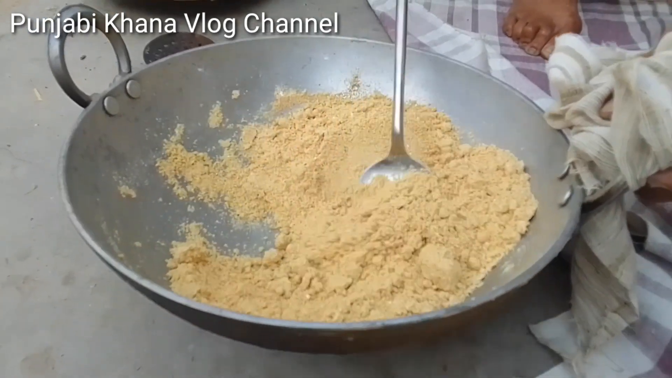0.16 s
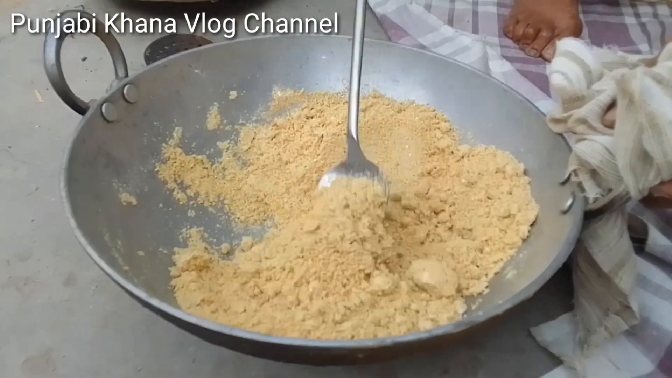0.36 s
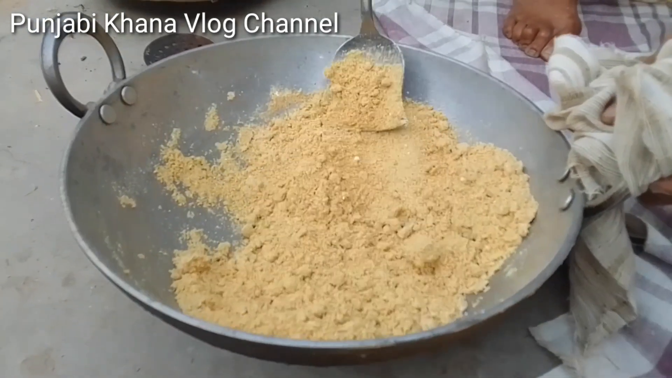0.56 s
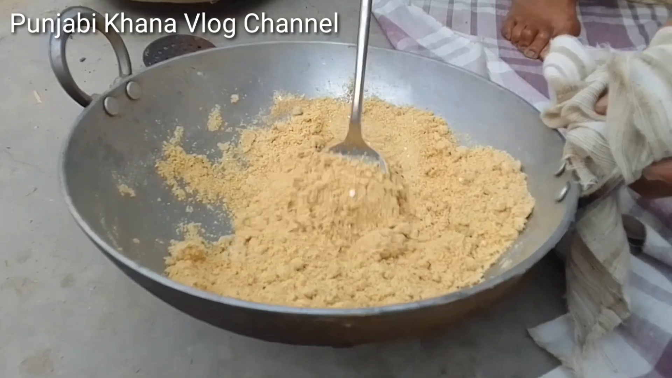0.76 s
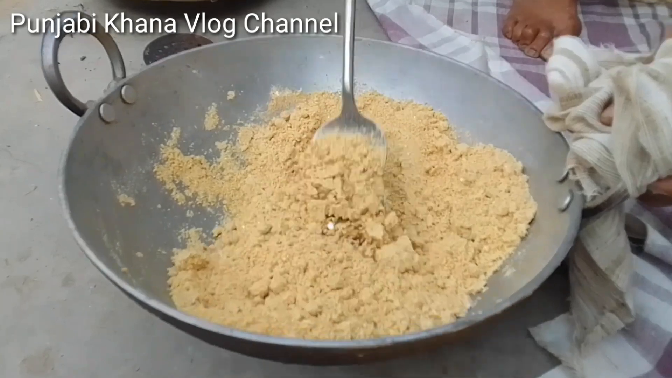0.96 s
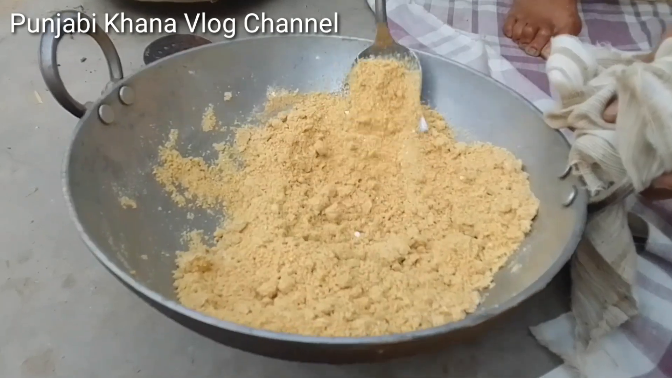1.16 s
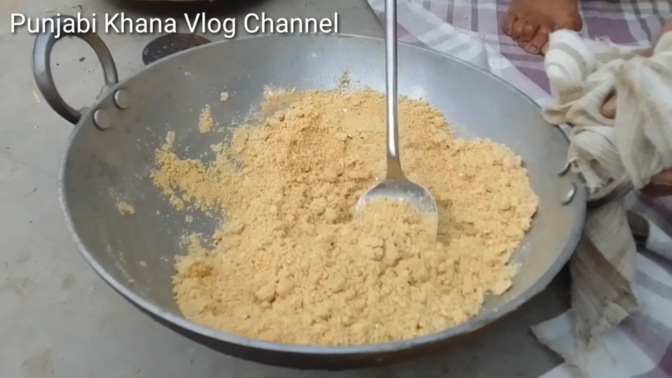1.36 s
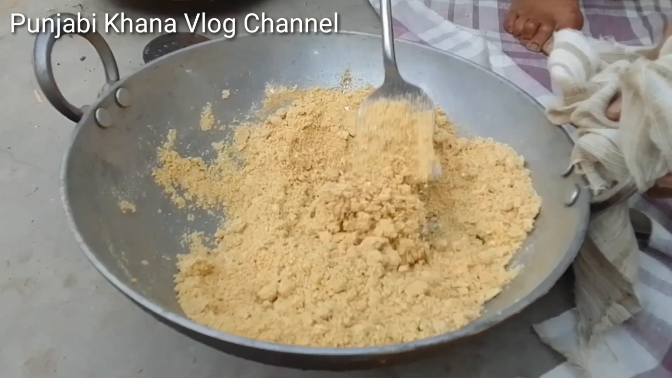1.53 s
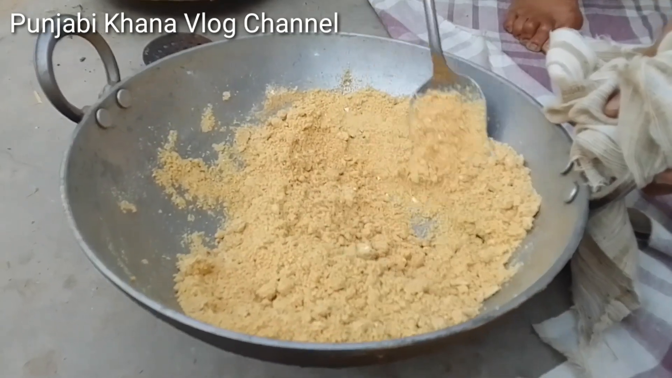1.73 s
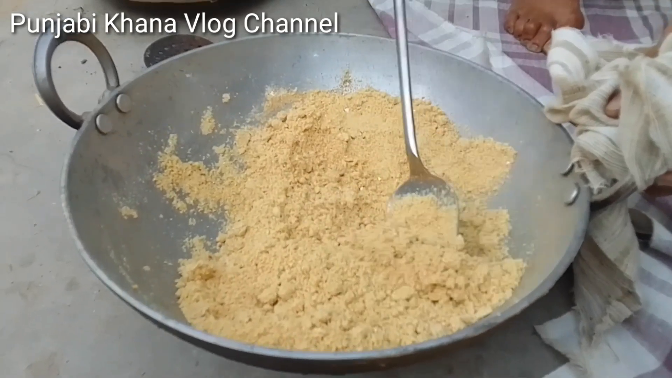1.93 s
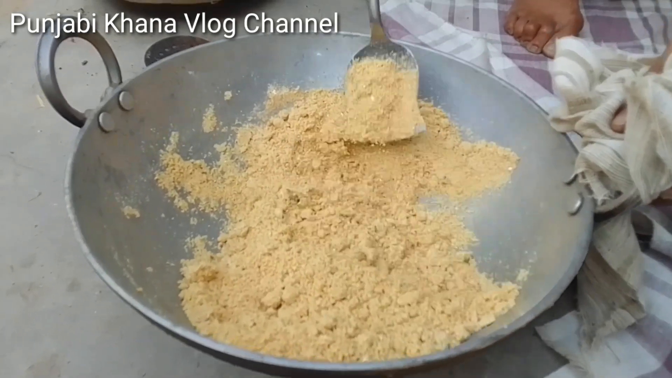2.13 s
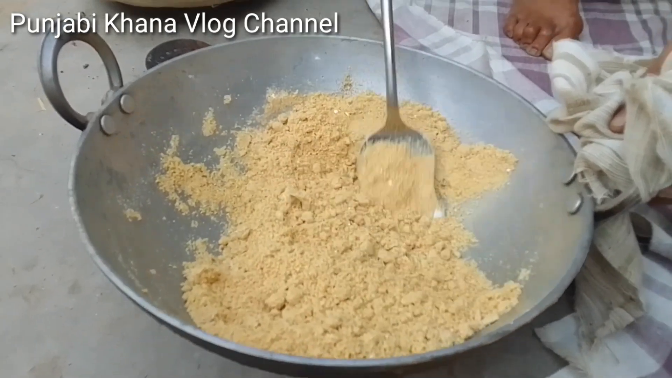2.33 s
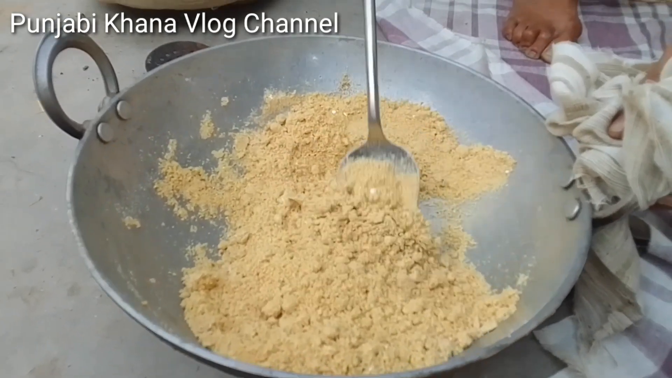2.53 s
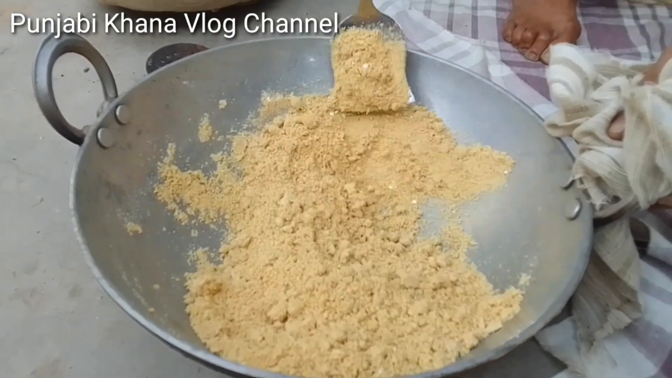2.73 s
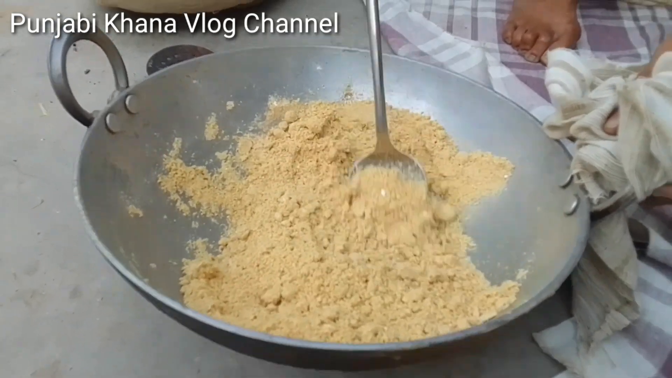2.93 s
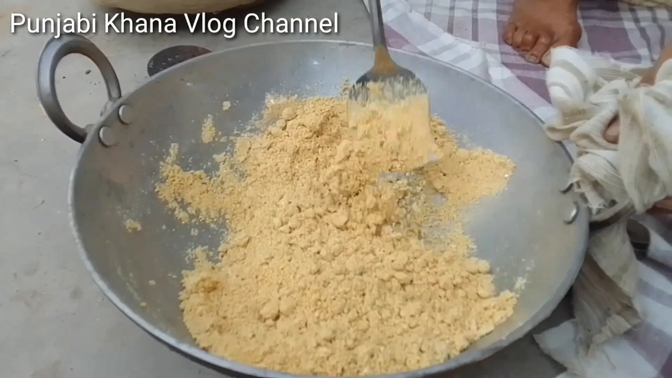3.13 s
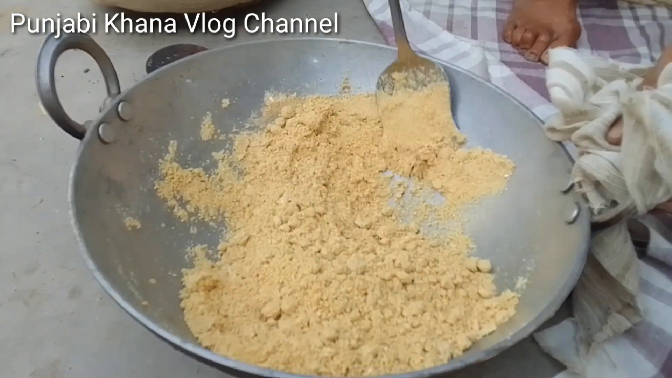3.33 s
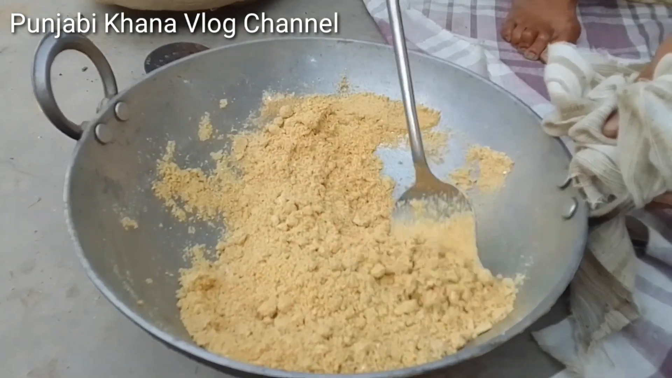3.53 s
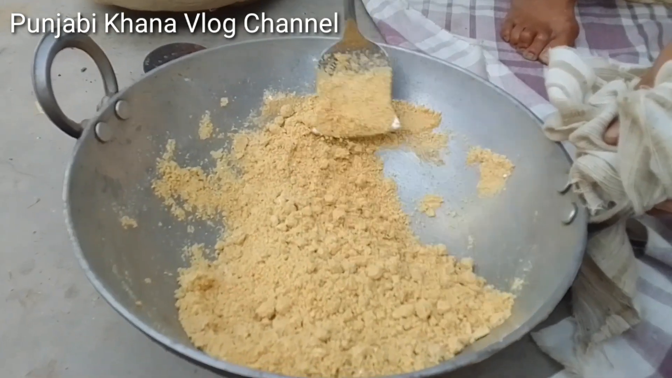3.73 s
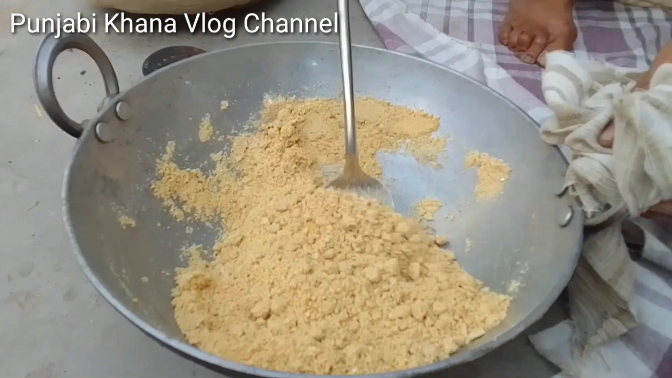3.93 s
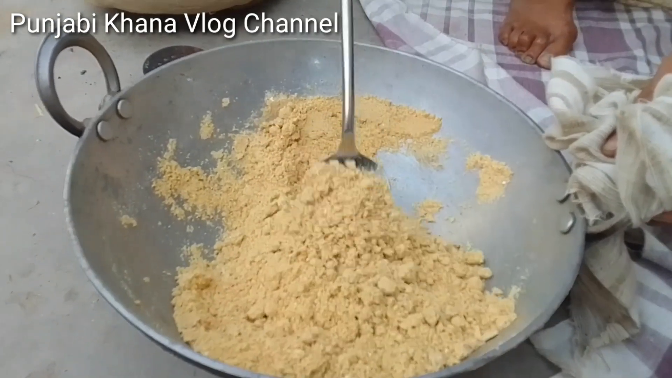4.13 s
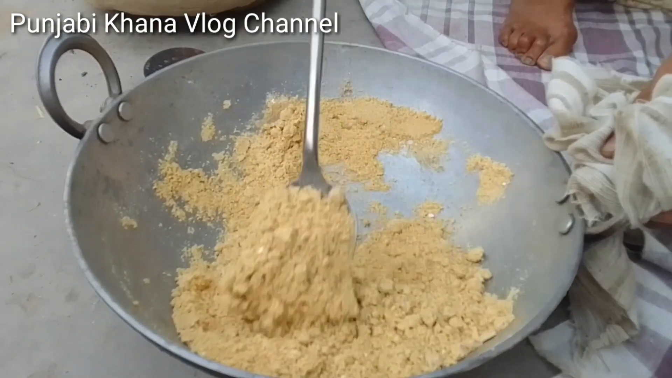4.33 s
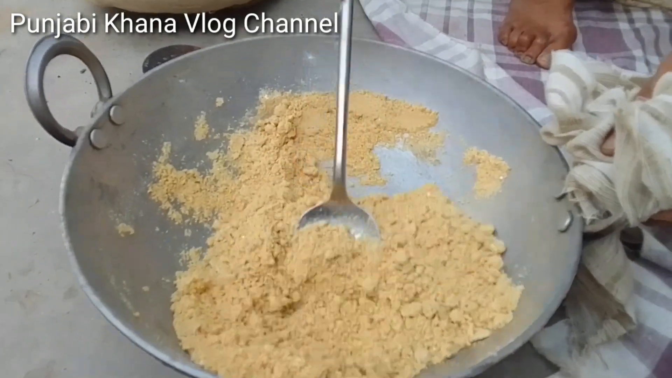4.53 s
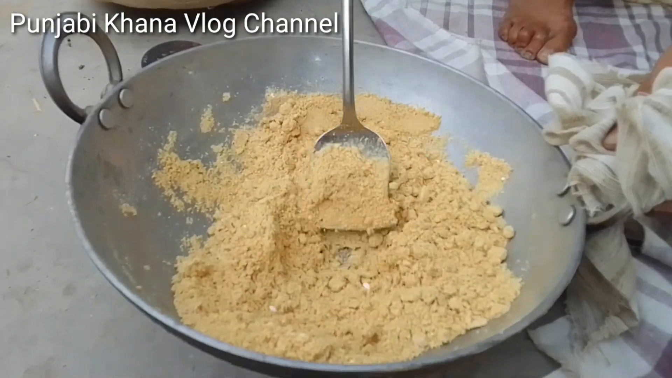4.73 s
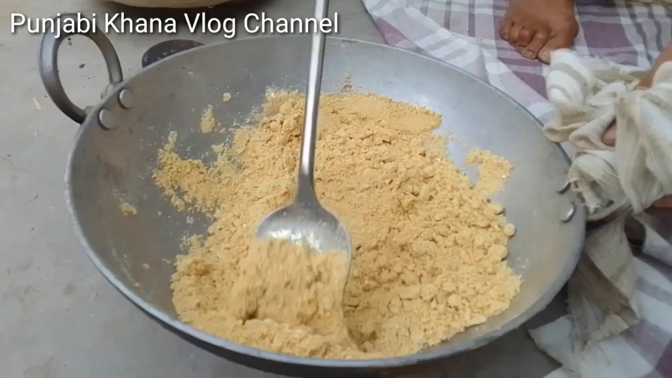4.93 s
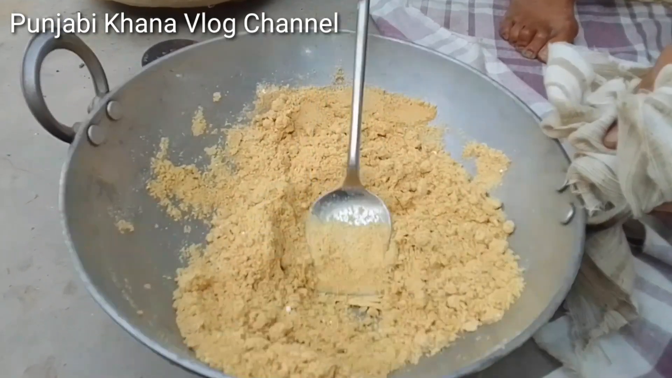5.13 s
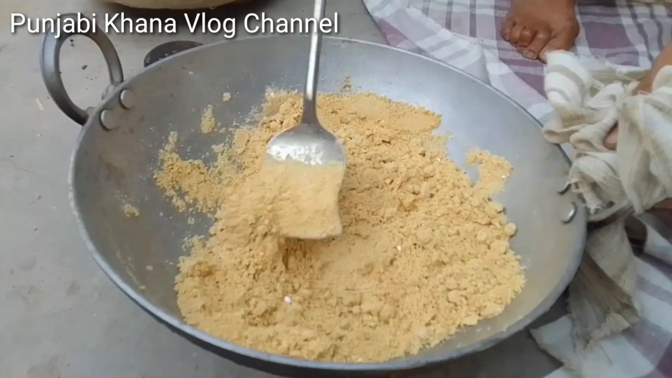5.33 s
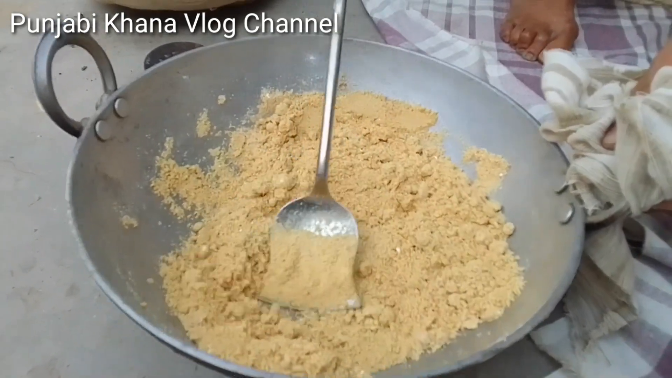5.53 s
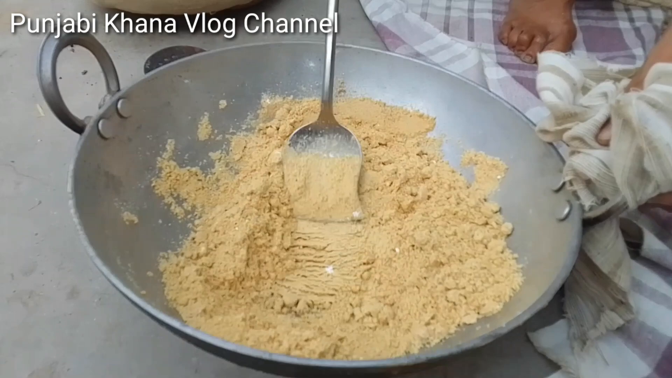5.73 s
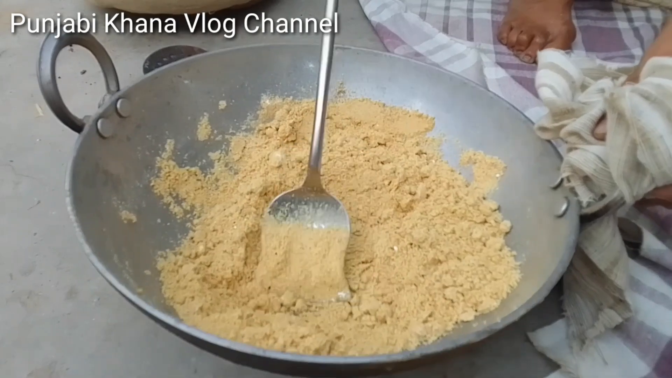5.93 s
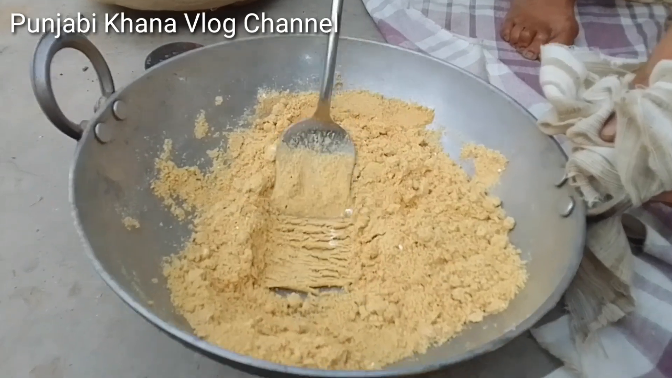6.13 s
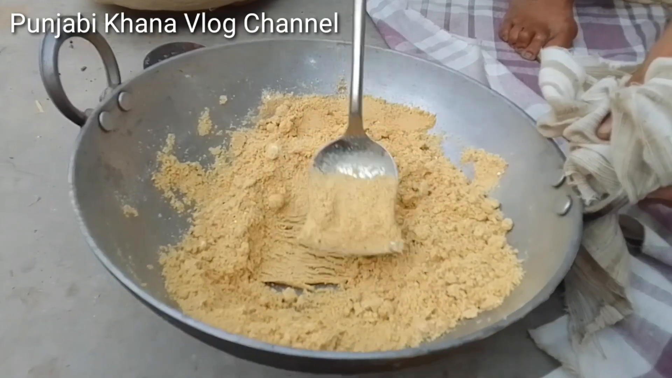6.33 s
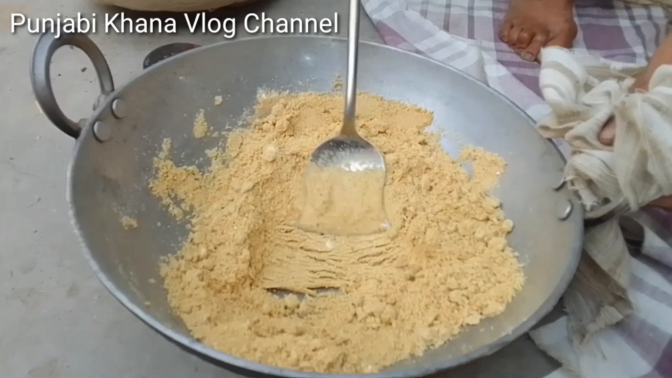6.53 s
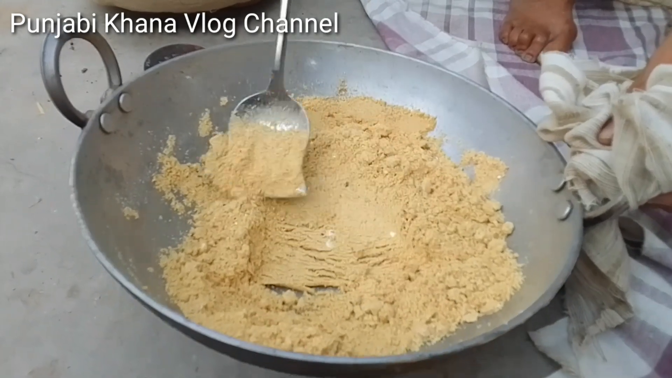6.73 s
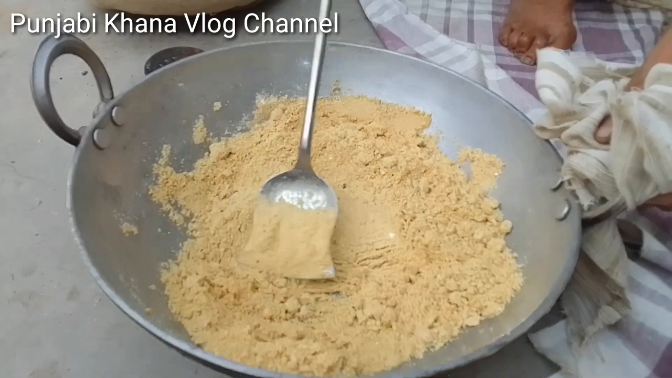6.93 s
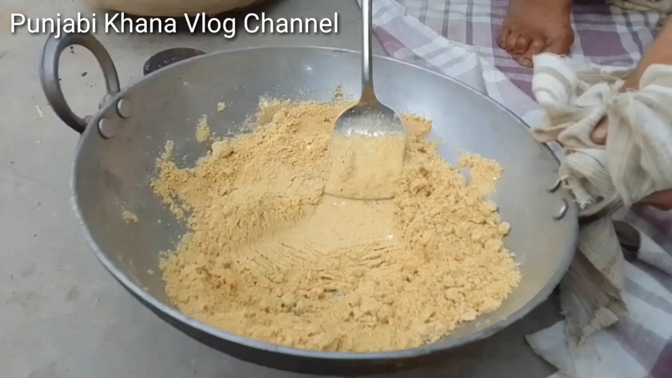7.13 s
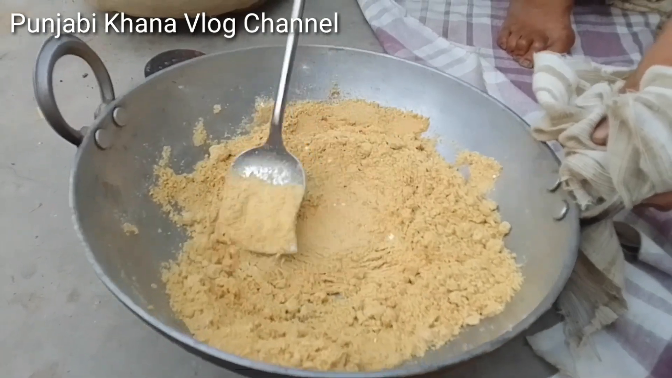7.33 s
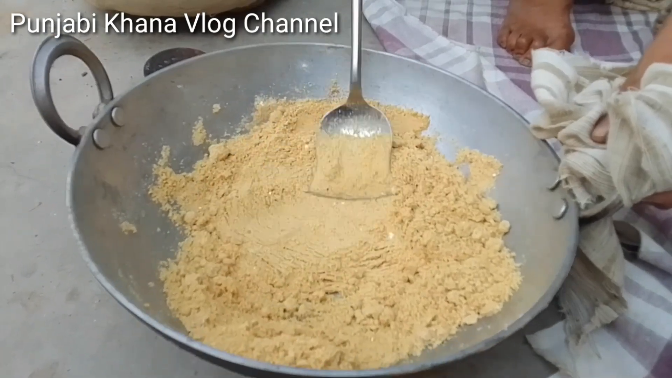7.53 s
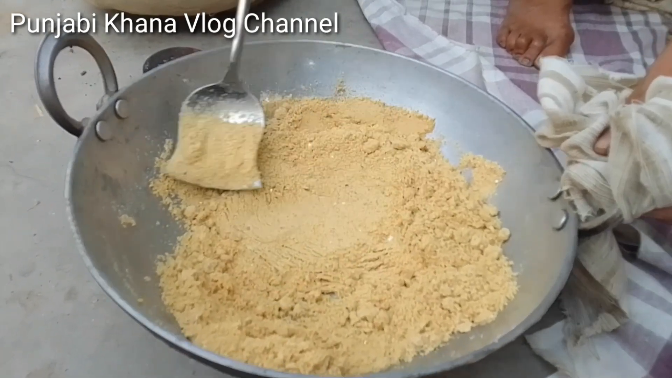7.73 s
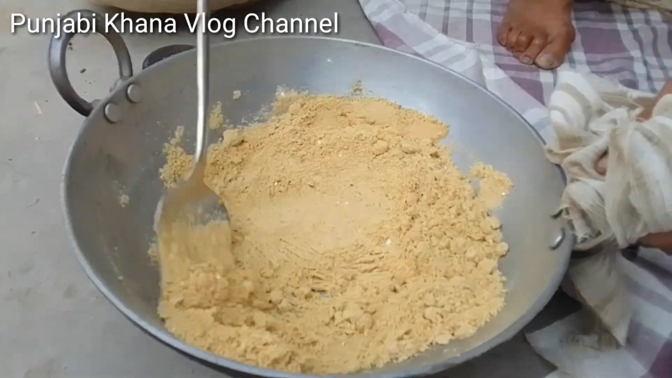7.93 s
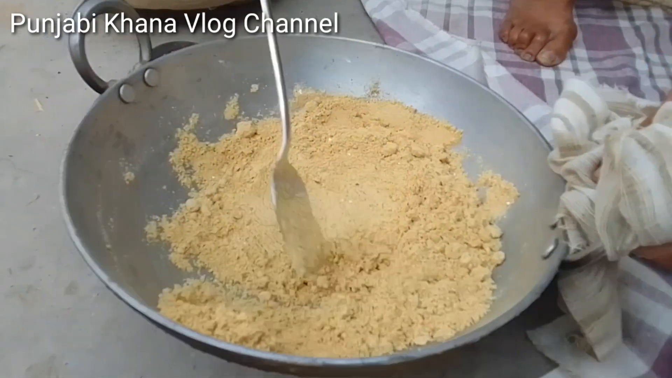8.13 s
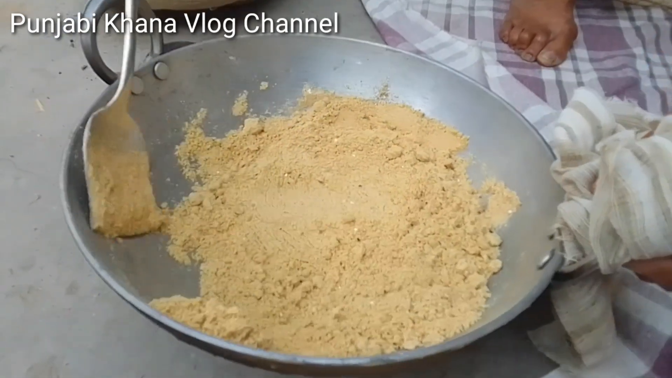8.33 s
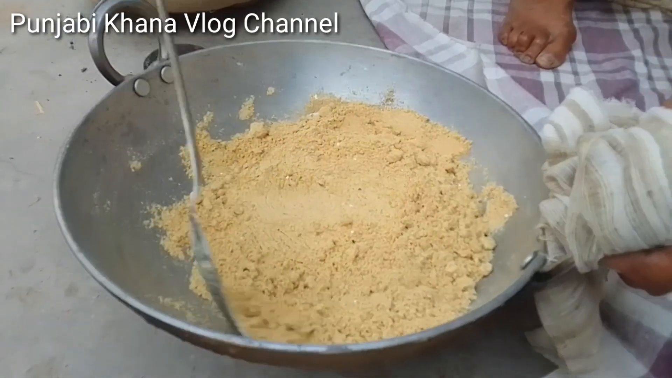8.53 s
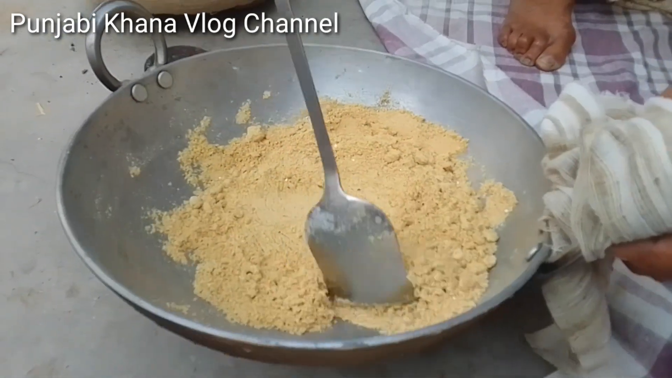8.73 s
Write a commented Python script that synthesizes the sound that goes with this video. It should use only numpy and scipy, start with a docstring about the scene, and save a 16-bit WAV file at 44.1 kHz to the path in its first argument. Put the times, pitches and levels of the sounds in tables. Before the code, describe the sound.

Close to the microphone, a metal spatula pushes dry roasted flour around a thin wok, each stroke a crisp gritty hiss with a light knock and short metallic ring. Strokes come about twice a second, strongest near four seconds, then turn soft and sparse before a burst of quick scrapes and clanks near the end. Small birds trill at the start and end, over a quiet low rumble.

```python
"""Scraping a wok by an open door

A steel spatula scrapes roasted flour around a thin metal wok that stands on the floor near an open door.
Each stroke lands with a knock and drags gritty grains over the metal: random slips and blows drive damped
modes. Small birds whistle and trill outside and a dove coos once, all as frequency-modulated sines. Filtered
noise gives a low room rumble and far hiss; steady sines give motor tones and a mains hum that comes and goes.
"""
import sys
import numpy as np
from scipy import signal
from scipy.io import wavfile

SR = 44100
rng = np.random.default_rng(int(sys.argv[2]) if len(sys.argv) > 2 else 0)


def pcm_store(signal):
    """Save signal as 16-bit PCM."""
    levels = np.round(np.clip(np.atleast_2d(signal), -1, 1) * 32767)
    wavfile.write(sys.argv[1], SR, levels.astype(np.int16).T)


N = 390710
BLOW_SAMPLES = 600   # span computed for each blow


def amp(db):
    """Decibel definition: the amplitude gain of a level in dB."""
    return 10 ** (np.asarray(db) / 20)


def rms_one(x):
    """Power normalisation: scale to an rms of 1."""
    return x / np.sqrt(np.mean(x ** 2) + 1e-20)


def in_time(rows):
    """Linear interpolation: the columns of a (time, ...) table at every sample."""
    s, *columns = np.transpose(rows)
    return [np.interp(np.arange(N) / SR, s, c) for c in columns]


def filtered(x, order, hz, kind):
    """Butterworth filtering: a maximally flat pass band."""
    return signal.sosfilt(signal.butter(order, hz, kind, fs=SR, output="sos"), x)


def drift(rate):
    """Low-passed noise: a slow random curve of spread 1 that changes about rate times a second."""
    steps = rng.standard_normal(N // 40 + 2002)
    r = np.exp(-80 * np.pi * rate / SR)   # one step per 40 samples
    slow = signal.lfilter([1], [1, -2 * r, r * r], steps)[2000:]
    return np.interp(np.arange(N) / 40, np.arange(len(slow)), rms_one(slow))


def ring(x, hz, width_hz):
    """Damped resonance: a unit click starts a decaying wave of height 1; little leaks far from the mode."""
    r, w = np.exp(-np.pi * width_hz / SR), 2 * np.pi * hz / SR
    return signal.lfilter([.5, 0, -.5], [1, -2 * r * np.cos(w), r * r], x + 1e-18)


def coloured(sources, spectrum, patchy_db, rate, tint_db=lambda hz: 0):
    """Third-octave synthesis: bands of two sources in turn, each flickering alone and tinted over time."""
    hz, db = np.transpose(spectrum)
    out, power = 0, 0
    edges = 30 * 2 ** np.arange(0, 9.2, 1 / 3)
    for k, (low, high) in enumerate(zip(edges, edges[1:])):
        if hz[0] < high and low < hz[-1]:
            band = filtered(sources[k % 2], 2, [low, high], "band")
            band_db = np.interp(np.log(low * high) / 2, np.log(hz), db)
            band = band * amp(band_db + patchy_db * drift(rate))
            out = out + band * amp(tint_db(np.sqrt(low * high)))
            power = power + np.mean(band ** 2)   # the tint is left out of the normalisation
    return out / np.sqrt(power)


def grains(per_s, spread_db):
    """Poisson impulses: two streams of tiny slips of uneven size, with an rms of 1."""
    sizes = amp(spread_db * np.minimum(rng.exponential(1, (2, N)), 5)) * rng.choice([-1, 1], (2, N))
    return rms_one(sizes * (rng.random((2, N)) < per_s / SR))


def echoes(x, t60_s, spread_s):
    """Diffuse reverberation: convolution with decaying noise of energy 1 that builds up over spread_s."""
    t = np.arange(SR) / SR
    tail = rng.standard_normal(SR) * amp(-60 * t / t60_s) * np.minimum(t / spread_s, 1)
    return signal.fftconvolve(x, tail / np.sqrt(np.sum(tail ** 2)))[:N]


def share(hz, levels, centres_hz):
    """Log-frequency interpolation: the level at a pitch between levels known at a few pitches."""
    place = np.interp(np.log(hz), np.log(centres_hz), np.arange(len(levels)))
    k = min(int(place), len(levels) - 2)
    return levels[k] + (place - k) * (levels[k + 1] - levels[k])


# Spatula strokes: (landing [s], landing crunch [dB], level as the drag sets in [dB], press length [s],
# full grit [dB], drag length [s], grit at lift [dB], flour sliding back re full grit [dB],
# then metal ring re grit [dB] at each of the nine RING_HZ)
STROKES = [(-0.25, -44.5, -47, 0.15, -39.5, 0.046, -49.5, -24.5, 8, 14, -1, 5, 15, -1, 12, 3, -2),
           (0.198, -53.5, -52, 0.052, -38, 0.061, -46.5, -12.5, -17, -5, -6, -10, 5, 8.5, 4, 7.3, -2),
           (0.76, -52.5, -56.5, 0.061, -38, 0.059, -46, -16, 1, 6.5, 4, -4, 13, 15, 7.5, 5.8, -13),
           (1.324, -42, -49, 0.067, -36.5, 0.024, -45.5, -20, -6, 0, 2, -2.5, 7, 5, 5, 3.6, 3),
           (1.815, -45, -54.5, 0.093, -40, 0.043, -44, -16, -5.5, -5.5, -5.5, -7, -15, 0.5, -1.5, 2, -8.5),
           (2.378, -43, -57.5, 0.06, -42, 0.017, -41.5, -16, -0.5, 4, 3.5, 0, 9, 5, 6, 2.5, 6),
           (2.865, -76.5, -69, 0.04, -61.5, 0.017, -69, -19, 14, -7, -9, -10.5, -12.5, -10, -1, 3.4, 0),
           (2.911, -67, -48.5, 0.041, -43.5, 0.038, -34, -7, -22, -5, -2.5, -6.5, -0.5, -0.5, 6, 4.4, -24),
           (3.338, -61, -70, 0.063, -63, .02, -51, -26, -12, -12, -22, -15, -12, -12.5, -1, 3, 1),
           (3.394, -45, -50, 0.12, -32.5, 0.016, -37.5, -23, -5, -3.5, -6, -6.5, -7, -0.5, 8, 6.4, 11.5),
           (3.894, -37, -51, 0.088, -30.5, 0.079, -40, -18.5, -5, -2.5, -4.5, -11, 4.5, -4, -2, 0.5, -23),
           (4.459, -50.5, -64, 0.088, -47, 0.17, -54.5, -23, -1.5, -3, -2.5, -10, -25, 5, 4.5, 11.7, 4),
           (5.02, -58.5, -54, 0.055, -45, 0.11, -46.5, -3, -6.5, -7, -13, -22.5, -18, 0, -7, 1.6, -2),
           (5.541, -51, -60, 0.061, -54.5, 0.18, -62.5, -7.5, -8, -2.5, -1, -6, -18.5, 2, -2.5, 4.7, 7),
           (5.991, -60, -96, 0.05, -66.5, 0.16, -68, -12, 9.5, 12, -14, -20, -12, 5.5, -4, 5.1, -10),
           (6.461, -89.5, -83.5, 0.083, -70.5, 0.14, -84, -12.5, -8.5, -12, -16, -10, -9.5, -2.5, -3.5, 2.5, -1.5),
           (6.922, -48.5, -58.5, 0.11, -54.5, 0.2, -65.5, -13, 12, 1.5, 3, -16, -15, -3, -4, 2.1, -4),
           (7.39, -99, -84.5, 0.14, -73.5, 0.027, -78, -17, -14, -12, -29.5, -22, -18, -9.5, -7.5, 3.4, 6),
           (7.808, -30.5, -52, 0.096, -45.5, 0.014, -45, -15.5, 3, -0.5, 4, -0.5, -1, 1, 4.5, 2.3, -1),
           (7.92, -55, -47, 0.03, -36.5, 0.013, -40.5, -27, -3, -18, -4, -15, -17, -8, 5, 3, 10),
           (7.968, -48, -48.5, 0.024, -34.5, 0.0051, -42.5, -28, -23, -23, -12, -16, -22, -7, 1.5, 3.8, -1),
           (8.013, -31, -40, 0.0056, -43.5, 0.035, -34.5, -24, -29, -29, -16, -17, -20, -18, -7, 7.5, -4),
           (8.0591, -32.5, -32, 0.0037, -31.5, 0.031, -34.5, -18, -22, -21, -14, -29, -8, 2.5, 0, 2.4, 6),
           (8.348, -27.5, -33, 0.0058, -39.5, 0.0042, -54, -17, -3, -1, 15, 7, 11, -1, 3, 1.7, -2),
           (8.376, -60, -53, 0.15, -43.5, 0.16, -55, -5.5, -22, -9.5, -5, -34, -13, -13, 8, 10.2, 8),
           (8.654, -67, -46.5, 0.038, -49.5, 0.018, -52, -12, -3.5, 7, 2, -15, -13, 3, -7, 2.5, -2)]
# Centres of the ring ranges: (frequency [Hz])
RING_HZ = [480, 760, 1450, 2100, 3000, 4000, 6000, 8500, 12000]
# The landing crunch rings the metal less, by a different amount in each range: (offset [dB]) per ring range
CRUNCH_RING_DB = [-4.5, -7.5, -6, -7.5, -11.5, -13, -8, -8, -13]
# Ring follows the grit as the blade presses in, mostly weaker while the press is light:
# (ring dB per dB of grit [dB/dB]) per ring range
RING_FOLLOWS = [.4, 0.23, 0.019, 0.34, .33, 0.61, 0.047, 0.21, -.1]
# Ring of the sliding flour re its grit: (level [dB]) per ring range
SETTLE_RING_DB = [12, 3.7, 9.1, 7.3, 2.5, 0.53, 1.1, 3, 1.5]
# The sliding flour dies away: (decay [dB/s]) for the grit, then for each ring range
SETTLE_DB_PER_S = [84.2, 56.3, 57, 56, 56, 70, 88, 87, 85, 85.5]
SETTLE_KEEPS = 0.49   # share of the stroke's ring colour kept by the sliding flour
LEAD_IN_S, LEAD_IN_DB, LEAD_IN_RISE_DB = 0.03, -35, 13.5   # short faint rise of grit just before each landing
CRUNCH_DB_PER_S = 553   # the crunch dies fast
LIFT_DB_PER_S = 481.5   # fall of the grit as the blade lifts, after a very short drag
LONG_DRAG_S = 0.14      # after a drag this long the lift is half as abrupt


def strokes():
    """Power summation: a soft lead-in, crunch, press, drag, lift and settling give grit and ring re grit [dB]."""
    step = np.arange(0, N + 16, 16)
    power = np.full((1 + len(RING_HZ), len(step)), 1e-13)
    for start, crunch_db, from_db, press, full_db, drag, lift_db, slide_db, *colour in STROKES:
        t = step / SR - start
        colour = np.array([0, *colour])[:, None]
        landed = t >= 0
        lead_in = crunch_db + LEAD_IN_DB + LEAD_IN_RISE_DB * np.minimum(t, 0) / LEAD_IN_S
        crunch = crunch_db - CRUNCH_DB_PER_S * np.maximum(t, 0)
        soft = np.where(landed, crunch, lead_in) + colour + np.array([[0, *CRUNCH_RING_DB]]).T
        lifting = LIFT_DB_PER_S / (1 + drag / LONG_DRAG_S) * np.maximum(t - press - drag, 0)
        blade = np.interp(t, [0, press, press + drag], [from_db, full_db, lift_db]) - lifting
        pressing = np.interp(t, [0, press], [from_db - full_db, 0])
        blade = blade + colour + np.array([[0.0013, *RING_FOLLOWS]]).T * pressing
        settle = full_db + pressing + slide_db + np.array([[0.0033, *SETTLE_RING_DB]]).T
        settle = settle + SETTLE_KEEPS * colour
        settle = settle - np.array([SETTLE_DB_PER_S]).T * np.maximum(t - press, 0)
        power += amp(2 * soft) + landed * (amp(2 * blade) + amp(2 * settle))
    grit_db, *ring_db = [np.interp(np.arange(N), step, 10 * np.log10(p)) for p in power]
    return [grit_db] + [db - grit_db for db in ring_db]


def stick_slip(hiss_db):
    """Stick-slip friction: fine slips under the edge, and coarse lumps crushed against the wall."""
    # the edge skips in clumps, more when pressed hard
    judder = amp(np.clip((hiss_db + 64) / 24, .3, 1.3) * (1.1 * drift(50) + 1.6 * drift(200)))
    fine = (grains(9000, 3.3) + amp(-13.0) * grains(220, 3.3)) * judder   # now and then a crackle
    lumps = amp(-12.5) * grains(250, 4.7) * judder
    return fine, lumps


# Spectrum of the grit hiss: (frequency [Hz], relative density [dB per Hz])
GRIT = [(2600, -21.5), (3200, -7), (3930, 10.5), (6130, 9.5), (7780, -0.5), (8460, 16), (11000, -2),
        (14400, -18.5), (15600, -28)]
GRIT_TINT = 0.27   # dB of grit colour per dB of ring colour


def grit_hiss(fine, hiss_db, ring_db):
    """Broadband friction noise: grit hisses under the blade edge, tinted by part of the stroke's colour."""
    tint_db = lambda hz: GRIT_TINT * share(hz, ring_db, RING_HZ)
    hiss = filtered(coloured(fine, GRIT, 3.3, 37, tint_db), 5, 3150, "high")
    out = amp(hiss_db - 5.0) * hiss
    # a very short dense echo gives the hiss a fine metallic grain
    return amp(-2.0) * out + amp(-4.5) * echoes(out, 0.025, 0.00076)


# Modes of wok and blade: (frequency [Hz], bandwidth [Hz], relative level [dB])
WOK = [(402, 24, -11.5), (480.3, 22, -1.5), (697, 59, -3), (796, 76, -0.5), (1350, 230, -3.5),
       (1500, 130, -8.5), (1653, 14, -16), (1837, 110, -5), (1972, 46, -1), (2126, 45, -5.5),
       (2272, 52, -3), (2414, 35, -9), (2735, 85, -8.5), (2909, 20, -10.5), (3183, 100, -6),
       (3314, 50, -3.5), (3430, 37, -9.5), (3684, 150, -2.5), (3977, 370, 1.5), (4320, 160, -3.5),
       (4360, 17, -6.5), (4786, 210, -3), (5460, 56, -5.5), (5836, 120, -5.5), (6336, 230, -4),
       (6770, 95, -3.5), (7180, 50, -9), (7520, 290, -11), (7800, 30, -7), (8270, 70, -3.5),
       (8513, 160, -1.5), (8730, 47, -14), (9270, 28, -12.5), (10750, 60, -10), (10870, 130, -11),
       (10400, 100, -18), (11550, 80, -15), (11700, 60, -14), (12940, 40, -22), (13600, 46, -20.5),
       (14100, 80, -24.5)]


def metal_modes(slips, hiss_db, ring_db):
    """Modal superposition: stick-slip and knocks drive the same damped metal modes."""
    out = 0
    for k, (hz, width, db) in enumerate(WOK):
        # the contact point moves across the nodes of each mode
        wander_db = np.clip(hz / 1800, .4, 1) * (3.64 * drift(16) + 2.5 * drift(3.5))
        drive_db = hiss_db + share(hz, ring_db, RING_HZ) + db - 32.0 + wander_db
        drive = slips[k % 2] * amp(drive_db)
        add_knocks(drive, hz, db)
        out = out + ring(drive, hz, width) * np.sqrt(width / 100)
    return out


# Bird notes: (start [s], end [s], start pitch [Hz], middle pitch [Hz], end pitch [Hz], relative level [dB],
# trill swing before its waveform shaping [Hz], trill rate [1/s])
BIRDS = [(0.0, 0.012, 4500, 4660, 4800, -45, 100, 124), (0.0, 0.035, 4850, 5070, 5170, -50.5, 60, 77),
         (0.052, 0.14, 6750, 6730, 6630, -65, 160, 90), (0.104, 0.185, 3650, 4810, 5210, -46.5, 37, 49),
         (0.185, 0.213, 5150, 4830, 4430, -41.5, 41, 62), (0.203, 0.229, 3890, 3810, 3740, -40.5, 110, 110),
         (0.297, 0.341, 3930, 4270, 4330, -45.5, 41, 110), (0.34, 0.44, 6120, 6280, 6380, -50.5, 380, 100),
         (0.466, 0.497, 3650, 3890, 4100, -54.5, 50, 125), (0.496, 0.545, 4100, 4420, 4637, -45.5, 60, 125),
         (0.543, 0.661, 6260, 6430, 6640, -51.5, 520, 120), (0.537, 0.549, 4600, 5300, 6270, -59, 27, 90),
         (0.553, 0.6, 4200, 4350, 4880, -54, 30, 60), (0.667, 0.7, 3680, 3790, 3730, -57.5, 33, 81),
         (0.685, 0.714, 4080, 4260, 4370, -47, 47, 62), (0.724, 0.744, 4350, 4450, 4550, -44, 40, 62),
         (0.739, 0.752, 4800, 5060, 5340, -55, 30, 120), (0.776, .784, 7300, 6790, 6200, -33, 27, 180),
         (0.789, 0.793, 4300, 4500, 4700, -39.5, 34, 140), (0.79, 0.797, 3900, 3793, 3680, -40, 30, 140),
         (2.64, 2.874, 1700, 1710, 1636, -72, 3.6, 100), (4.233, 4.4, 2690, 2665, 2745, -82, 6.6, 110),
         (7.749, 7.79, 4500, 5700, 6100, -72.5, 140, 150), (8.112, 8.191, 5800, 5920, 6100, -56, 310, 77),
         (8.216, 8.232, 3970, 4300, 4700, -58, 30, 80), (8.227, 8.365, 5000, 5990, 6290, -45, 850, 69),
         (8.445, 8.615, 4700, 6250, 4680, -48.5, 600, 85), (8.656, 8.79, 4150, 6080, 6360, -44.5, 710, 93),
         (8.819, 8.87, 4500, 4320, 3960, -60, 340, 210)]
TRILL_SWELLS_S = .125   # longer notes swell in slowly


def birds():
    """Frequency modulation: gliding whistles trill fast and unevenly; walls outside smear them."""
    out, t = np.zeros(N), np.arange(N) / SR
    uneven, flutter = 0.12 * drift(45), drift(110)
    for start, end, hz0, hz1, hz2, db, swing, rate in BIRDS:
        i = np.arange(round(max(start, 0) * SR), min(round(end * SR), N))
        u = np.linspace(0, 1, len(i))
        # parabola through the three pitches
        glide = hz0 * (1 - u) * (1 - 2 * u) + 4 * hz1 * u * (1 - u) + hz2 * u * (2 * u - 1)
        turn = 2 * np.pi * (rate * t[i] + uneven[i])
        trill = np.sin(turn) + 0.35 * np.sin(2 * turn)   # quick rise, slower fall
        pitch = glide + swing * np.minimum(u / 0.18, 1) * trill
        throb = 1 + np.clip(swing / 1100, 0, 1) * -np.cos(turn)   # louder on the way down
        level = amp(db) * throb * amp((2.5 + swing / 420) * flutter[i])
        attack = 0.13 + 0.41 * (end - start > TRILL_SWELLS_S)   # share of the note
        envelope = np.minimum(u / attack, 1) * (1 - u) ** 0.25
        out[i] += level * envelope * np.sin(2 * np.pi * np.cumsum(pitch) / SR)
    return amp(1.0) * out + amp(0.5) * echoes(out, 0.45, .003)


# Spectrum of the low rumble: (frequency [Hz], relative density [dB per Hz])
ROOM = [(50, -46), (85, -14.5), (134, -4), (209, 0), (247, -1), (412, -12.5), (483, 5), (700, -34),
        (910, -60.5), (1540, -120)]
# Rumble course: (time [s], low level [dB], level of its brighter edge [dB])
RUMBLE = [(0.0, -60, -79), (0.29, -60.5, -66), (0.74, -61.5, -83), (0.99, -58.5, -73), (1.9, -63.5, -75),
          (2.29, -65, -88.5), (2.64, -63, -75.5), (3.43, -61.5, -78), (3.63, -62.5, -69.5),
          (6.05, -62.5, -83), (6.17, -61, -72.5), (6.74, -69.5, -93.5), (6.96, -65, -94.5),
          (7.11, -60.5, -76.5), (7.6, -66.5, -96), (7.85, -65.5, -81), (7.97, -61.5, -72.5),
          (8.86, -61, -70)]


def room_rumble(white):
    """Band-limited noise: a low room rumble whose upper edge swells."""
    low_db, edge_db = in_time(RUMBLE)
    edge = rms_one(filtered(white[0, ::-1], 4, [600, 1050], "band"))
    low = amp(low_db) * coloured(white, ROOM, 3.1, 9.7)
    return low + amp(edge_db + 3.7 * drift(12.0)) * edge


# Spectrum of the steady far hiss: (frequency [Hz], relative density [dB per Hz])
AIR = [(530, -46.5), (900, -17.5), (944, 3), (1000, -9), (1470, -15), (1930, -10), (3350, -21.5),
       (3600, -13), (3860, -20), (7280, -17), (15600, -19)]
# Far band of hiss near 2 kHz, before a fixed 4.5 dB cut: (time [s], level [dB])
WASH = [(0.0, -86), (0.27, -88), (0.39, -63), (0.62, -74), (0.84, -92), (0.94, -71.5), (2.44, -95),
        (2.57, -64), (2.74, -84), (4.14, -69.5), (4.32, -73.5), (5.28, -74), (6.0, -85), (7.85, -88),
        (7.97, -57), (8.19, -70), (8.59, -61), (8.86, -70)]
AIR_DB = -81


def far_hiss(white):
    """Spectral shaping of noise: a steady far hiss and a band near 2 kHz that swells and fades."""
    wash = rms_one(filtered(white[1, ::-1], 3, [1850, 2420], "band"))
    wash_db = in_time(WASH)[0] - 4.5 + 0.9 * drift(6)
    return amp(AIR_DB) * coloured(white, AIR, .8, 5) + amp(wash_db) * wash


# Far motor tones: (frequency [Hz], level [dB])
DRONE = [(145.3, -79.5), (177.6, -77.5), (344.5, -78.5), (489.9, -75.5), (543.7, -85.5)]


def motor_tones():
    """Pure tones: far motors as sines that waver in level and phase."""
    out, t = np.zeros(N), np.arange(N) / SR
    for hz, db in DRONE:
        phase = 2 * np.pi * (hz * t + .3 * drift(3.7))
        out += np.sqrt(2) * amp(db + 1.5 * drift(10.0)) * np.sin(phase)
    return out


# Mains hum intervals; the fade-in begins 37 ms before the first time: (from [s], to [s], level [dB])
HUM = [(0, 1.452, -65.5), (3.499, 6.306, -64), (8.387, 8.898, -67.5)]
HUM_HZ = 100.2


def mains_hum():
    """Amplitude gating: a sine of wavering level that comes and goes."""
    t, on = np.arange(N) / SR, 0
    for start, end, db in HUM:
        on = on + amp(db) * np.clip(np.minimum(t - start + 0.037, end - t) / 0.031, 0, 1)
    return np.sqrt(2) * on * amp(1.5 * drift(3)) * np.sin(2 * np.pi * HUM_HZ * t)


def background():
    """Linear superposition: the rumble and the far hiss share one pair of noises, the tones are added."""
    white = rng.standard_normal((2, N))
    return room_rumble(white) + far_hiss(white) + motor_tones() + mains_hum()


def rattle(count, hz, t60_s):
    """Finite contact time: the edge meets the metal over milliseconds, each blow with its own strength."""
    t = np.arange(BLOW_SAMPLES) / SR
    shape = np.minimum(t / 0.0012, 1) * amp(-60 * t / t60_s)
    phase, luck = rng.uniform(0, 2 * np.pi, (count, 1)), rng.standard_normal((count, 1))
    return 2 * amp(2.9 * luck) * np.cos(2 * np.pi * hz * t + phase) * shape / shape.sum()


def blow_span(s):
    """Sampling: one row of sample numbers for each blow time."""
    return np.round(s * SR).astype(int)[:, None] + np.arange(BLOW_SAMPLES)


# Knocks, mostly the blade landing or catching, relative levels: (time [s], treble [dB], middle [dB], low [dB],
# floor thud [dB])
KNOCKS = [(0.1934, -15.5, -74, -45.5, -53), (0.2054, -15, -58, -39, -68), (0.7801, -21, -81, -52, -40.5),
          (0.8191, -12, -19, -30.5, -46), (0.8266, -7, -22, -45, -69), (0.8634, -7.5, -24, -50, -48),
          (1.035, -33, -70, -68.5, -67), (1.1984, -64, -53, -45.5, -60), (1.317, -28, -37, -73, -43),
          (1.3519, -13, -27.5, -37, -46), (1.8148, -62, -54, -50, -70), (1.855, -26, -42, -64, -82),
          (2.381, -32, -47, -77, -48), (2.4246, -16, -35, -39, -46), (2.716, -32.5, -70, -71, -76),
          (2.92, -54, -49.5, -51, -52), (3.34, -57, -96, -89, -55), (3.3967, -52, -69, -70, -52),
          (3.425, -39, -71, -65, -61), (3.4455, -43, -60, -70, -68), (3.4763, -35, -11.5, -90, -75),
          (3.4921, -9, -10.5, -53, -48.5), (3.506, -14, -38, -35, -75), (3.895, -44, -71, -67, -53),
          (3.9682, -2.5, -22, -29, -51), (3.996, -11, -10.5, -31, -73), (4.4618, -38, -67, -34, -35.5),
          (5.021, -18, -35, -30.5, -36.5), (5.108, -15.5, -64, -64, -56), (5.166, -25, -60, -65, -44.5),
          (5.545, -46, -72, -86, -47.5), (5.6, -35, -75, -75, -80), (5.9937, -43, -80, -57, -54.5),
          (6.133, -47, -85.5, -85.5, -85), (6.1817, -39, -85, -84, -89), (6.2976, -56, -90, -90.5, -90),
          (6.9218, -49, -63, -44, -46), (6.939, -33, -70, -60, -72), (7.016, -31, -75, -70, -75),
          (7.1, -27.5, -77, -70, -57.5), (7.197, -31, -78.5, -66.5, -75.5),
          (7.8103, -23, -34.5, -37.5, -51), (8.0145, -17, -63, -68, -54), (8.039, -25, -60, -67, -70),
          (7.8937, -23, -60, -70, -75), (7.9116, -25, -60, -70, -75), (7.948, -31, -50, -65, -72),
          (7.991, -31, -50, -67, -72), (8.0582, -18, -58, -62, -74), (8.3474, -3, -39, -26.5, -40.5),
          (8.708, -40, -60, -77, -58), (8.8244, -27, -68, -73, -73.5)]


def add_knocks(drive, hz, mode_db):
    """Impact excitation: add to a mode's drive the force of every knock near the mode's pitch."""
    s, treble_db, middle_db, low_db, _ = np.transpose(KNOCKS)
    blow_db = share(hz, [low_db + 0.5, middle_db - 7.0, treble_db - 24.5], [700, 1800, 4000])
    blow_db = blow_db + (2.5 if hz < 2500 else 1.3) * mode_db
    # where spans overlap, the row listed last counts
    drive[blow_span(s)] += amp(blow_db)[:, None] * rattle(len(s), hz, 0.007)


def floor_thuds():
    """Low-passed impact: knocks cushioned by the flour set four low resonances ringing."""
    s, *_, thud_db = np.transpose(KNOCKS)
    thuds = np.zeros(N)
    thuds[blow_span(s)[:, 0]] = amp(thud_db + 1.0)
    thuds = filtered(thuds, 2, 600, "low")
    out = ring(thuds, 150, 35) + 0.58 * ring(thuds, 220, 40)
    return out + 0.49 * ring(thuds, 330, 60) + 0.3 * ring(thuds, 500, 70)


# Dove coo: (time [s], pitch [Hz], level [dB])
COO = [(0.28, 283, -58), (0.3, 292, -60), (0.358, 340, -60), (0.442, 339, -77), (0.474, 333, -60.5),
       (0.55, 303, -60), (0.6, 306, -80)]


def dove():
    """Phase integration: one soft, nearly pure coo follows a pitch curve."""
    hz, db = in_time(COO)
    t = np.arange(N) / SR
    on = np.clip(np.minimum(t - COO[0][0], COO[-1][0] - t) / 0.05, 0, 1)
    return np.sqrt(2) * on * amp(db) * np.sin(2 * np.pi * np.cumsum(hz) / SR)


# Modes of the bare upper wall, free of flour: (frequency [Hz], relative level [dB], t60 [s])
RIM = [(656, -11.5, 0.1), (1368, -10.5, 0.12), (1524, -4, 0.11), (1630, -1.5, 0.11), (1903, -3, 0.093),
       (2110, -10, 0.089), (2380, -18, 0.14), (2876, -25, 0.21), (3420, 0.5, 0.047), (3300, -21, 0.31),
       (4016, -18, 0.16), (4320, -18, 0.15), (4500, -6, 0.08)]
# The blade strikes the bare wall: (time [s], relative level [dB])
RIM_HITS = [(7.8103, -50), (8.3468, -28.5)]
ON_RIM_FROM_S, RIM_SCRAPE_DB = 7.8, -50   # from then the blade also drags on the bare wall; drive re grit


def rim(scrape):
    """Light damping: clean blows and late scraping set the long modes of the bare wall ringing."""
    s, hit_db = np.transpose(RIM_HITS)
    scrape = scrape * amp(RIM_SCRAPE_DB) * (np.arange(N) > ON_RIM_FROM_S * SR)
    out = 0
    for hz, db, t60 in RIM:
        drive = scrape * amp(7.4 * drift(8.8))
        drive[blow_span(s)] += amp(hit_db)[:, None] * rattle(len(s), hz, 0.006)
        width_hz = np.log(1000) / (np.pi * t60)
        out = out + amp(db) * ring(drive, hz, width_hz)
    return out


def wok():
    """Shared excitation: the same slips make the hiss and, joined by coarse lumps, ring the metal."""
    hiss_db, *ring_db = strokes()
    fine, lumps = stick_slip(hiss_db)
    slips = fine + lumps
    out = grit_hiss(fine, hiss_db, ring_db) + metal_modes(slips, hiss_db, ring_db)
    return out + floor_thuds() + rim(slips[0] * amp(hiss_db))


# Ranges that hang on longest in the room: (from [Hz], to [Hz], level [dB], t60 [s])
LINGERS = [(1010, 2500, -8, 0.26), (3000, 3200, -3, 0.31)]


def scene():
    """Direct and reverberant sound: the wok close by with a little room, the rest far."""
    near = wok()
    out = near + amp(-15.5) * echoes(near, 0.19, 0.014) + birds() + dove() + background()
    for low_hz, high_hz, db, t60 in LINGERS:
        out += amp(db) * echoes(filtered(near, 2, [low_hz, high_hz], "band"), t60, 0.011)
    return out[None]


LOW_CUT_HZ, CUTOFF_HZ = 98.3, 16050   # deep bass roll-off; start of the stop band at the top


def record(dry):
    """Band limiting: the microphone chain drops deep bass, adds faint self-noise and cuts the top steeply."""
    out = filtered(dry, 6, LOW_CUT_HZ, "high")
    out = out + amp(-90.0) * rms_one(signal.lfilter([1], [1, -.99], rng.standard_normal(N)))
    return signal.sosfilt(signal.cheby2(14, 70, CUTOFF_HZ, fs=SR, output="sos"), out)


dry = scene()
out = record(dry)
pcm_store(out)
```